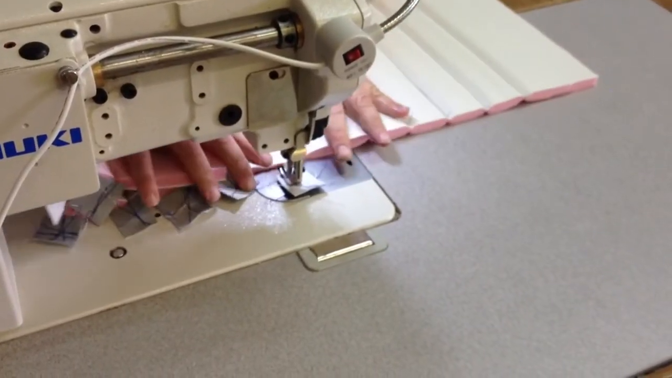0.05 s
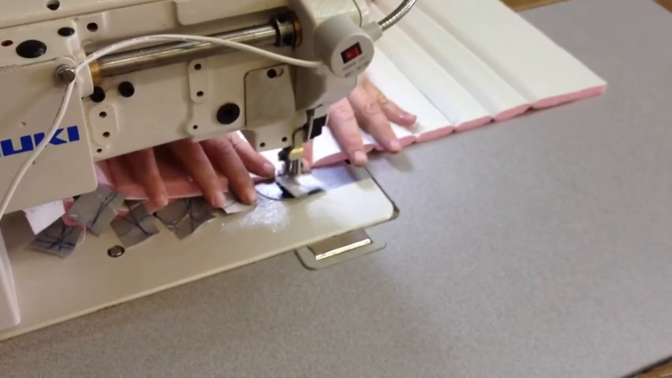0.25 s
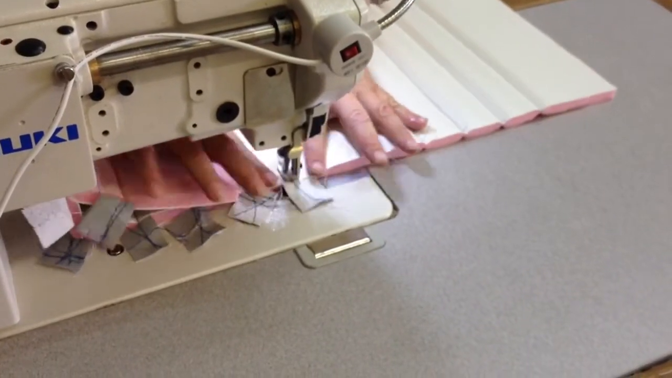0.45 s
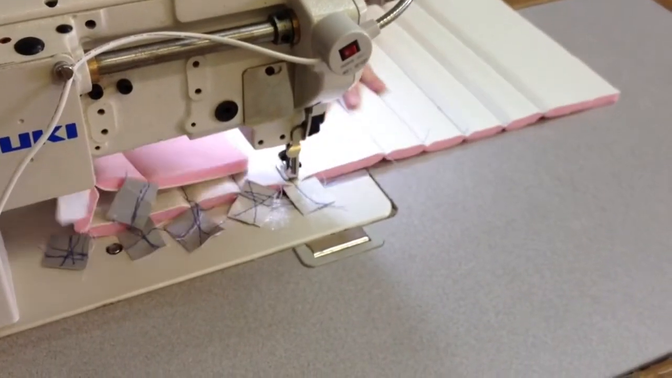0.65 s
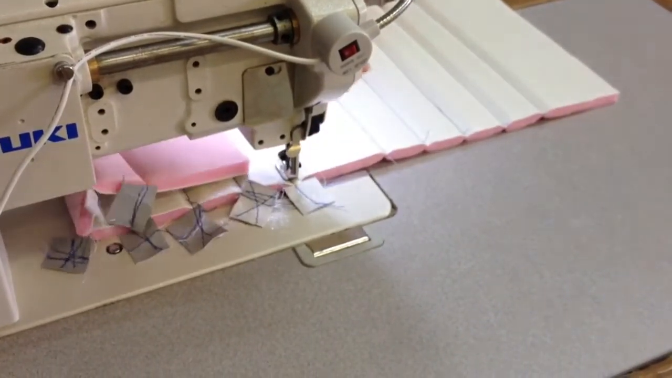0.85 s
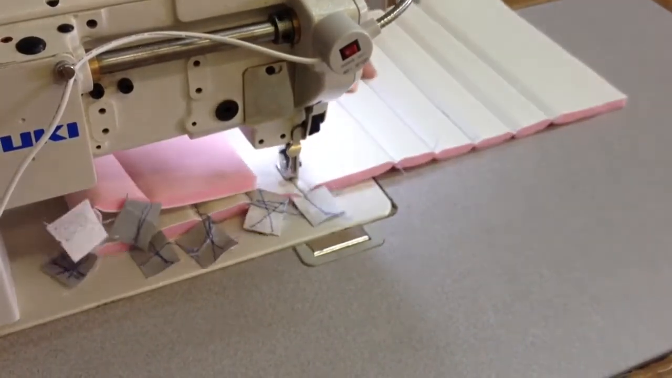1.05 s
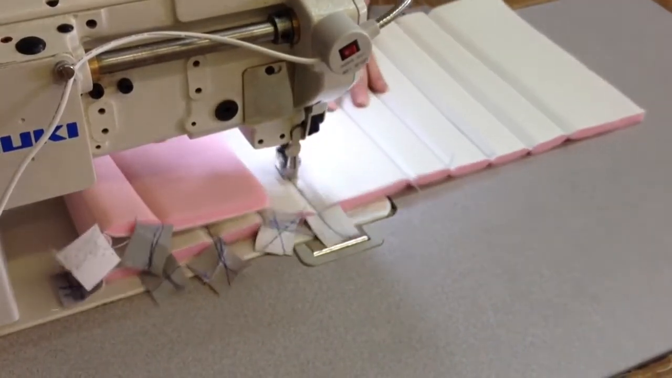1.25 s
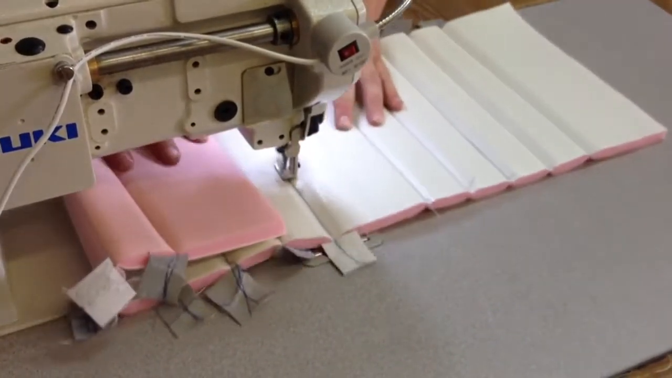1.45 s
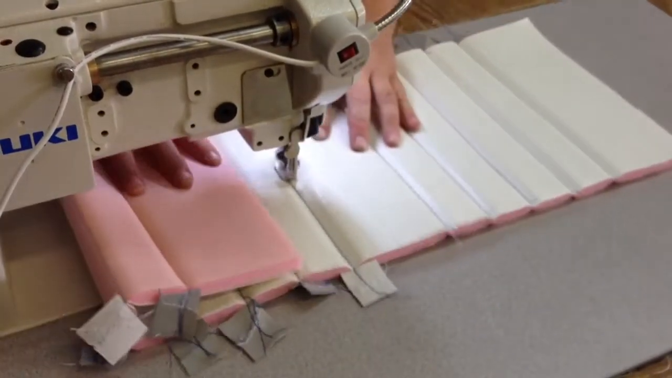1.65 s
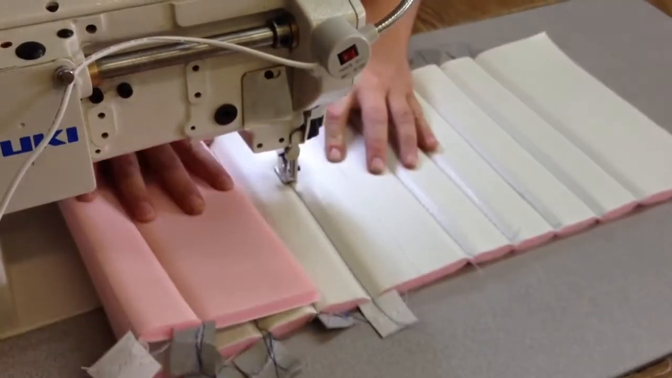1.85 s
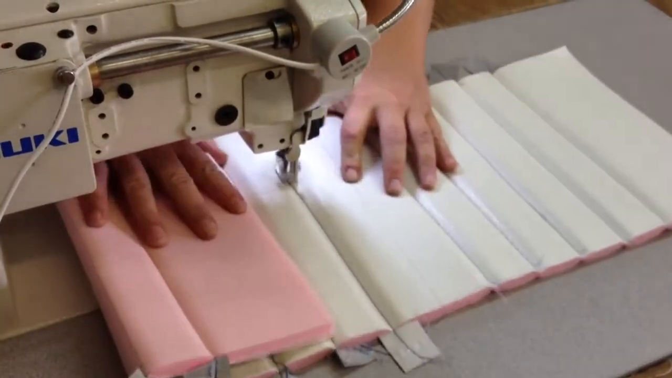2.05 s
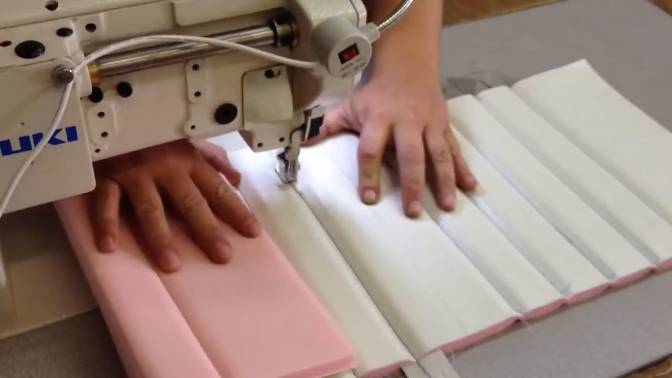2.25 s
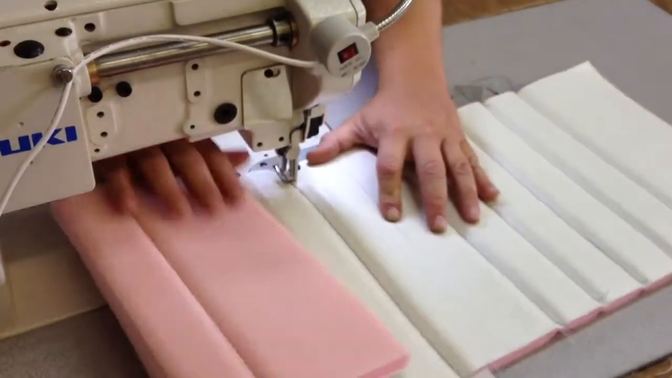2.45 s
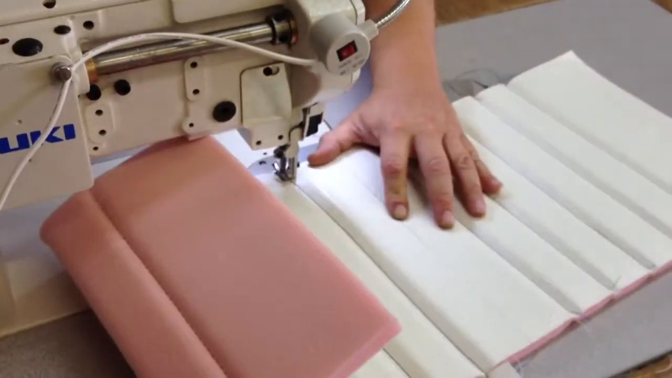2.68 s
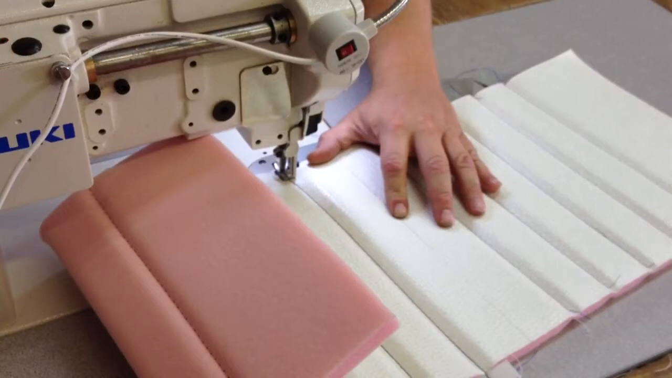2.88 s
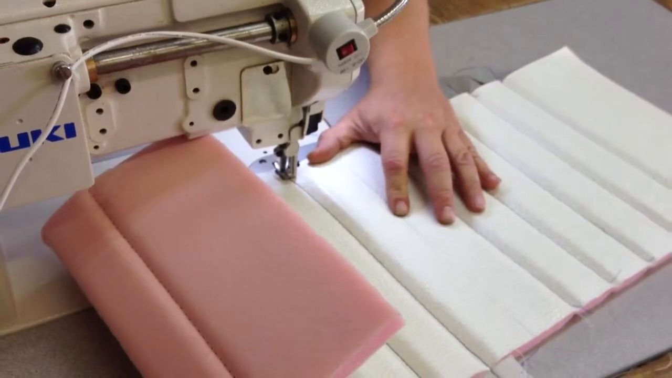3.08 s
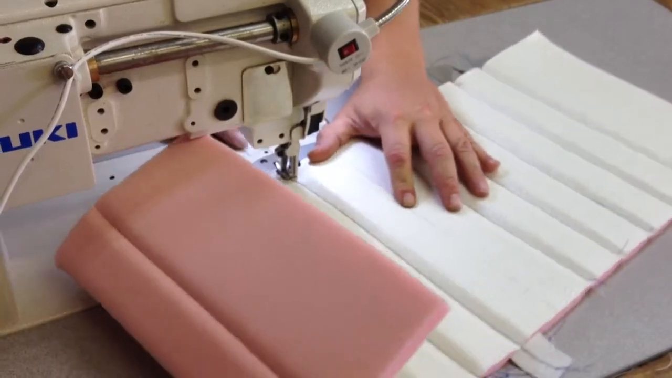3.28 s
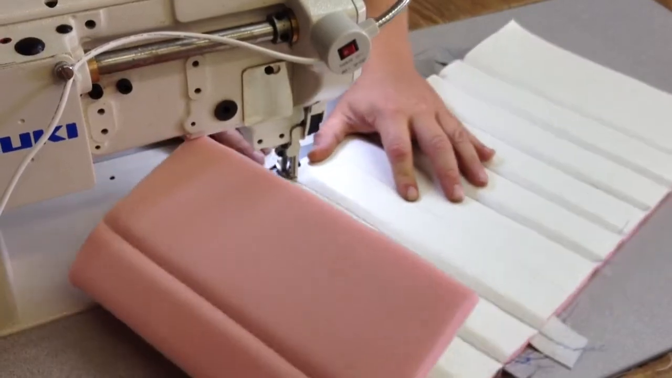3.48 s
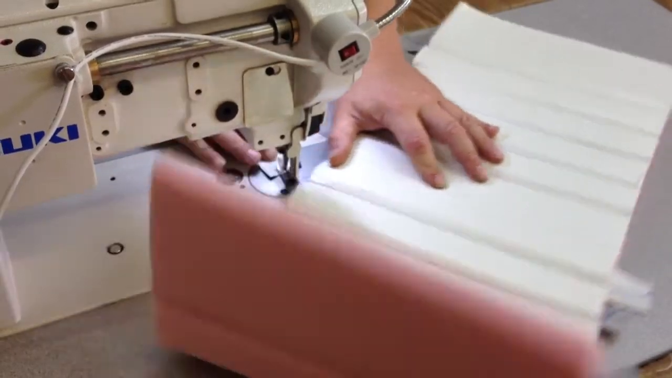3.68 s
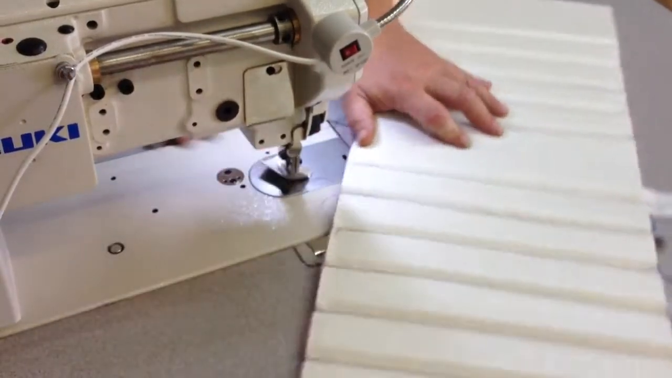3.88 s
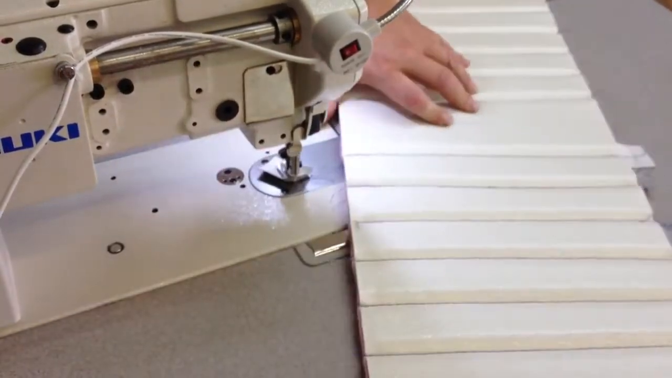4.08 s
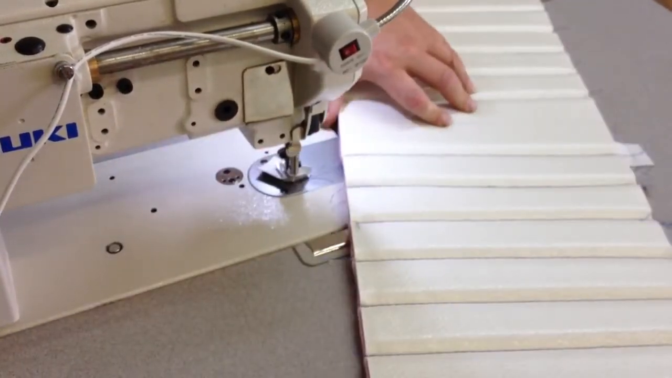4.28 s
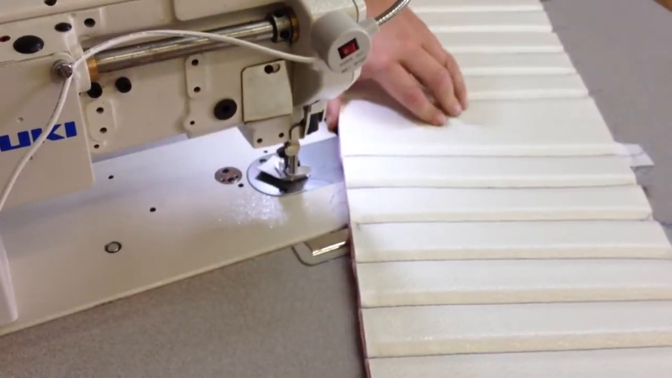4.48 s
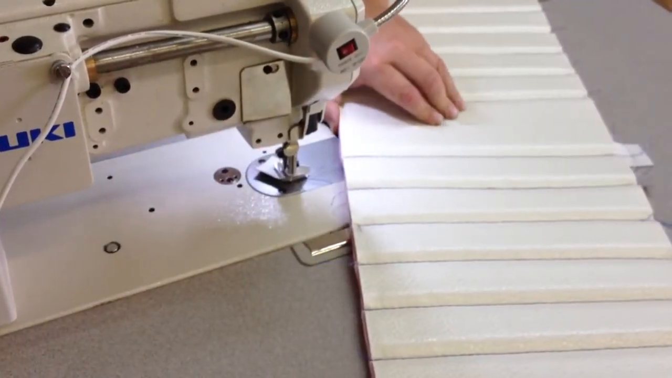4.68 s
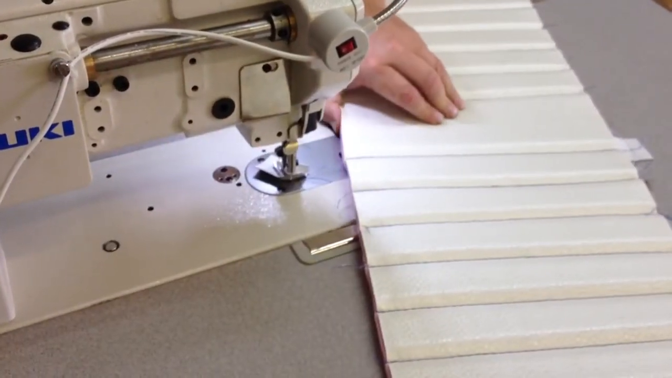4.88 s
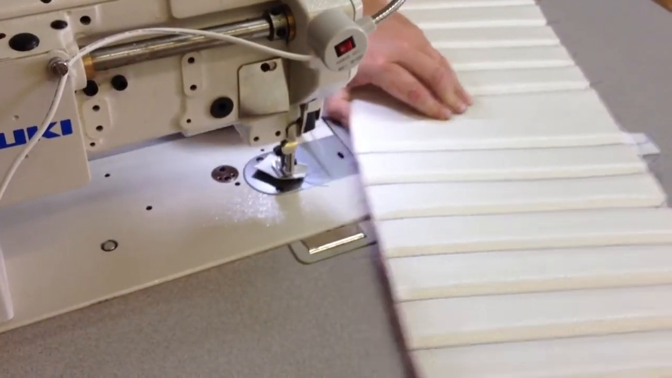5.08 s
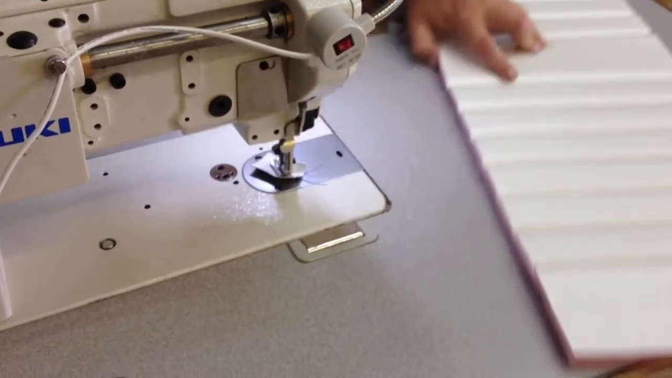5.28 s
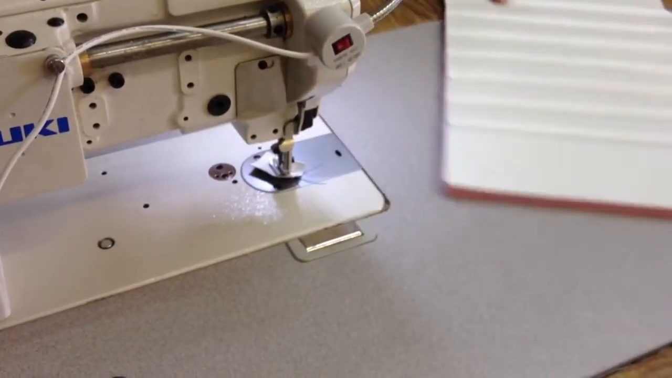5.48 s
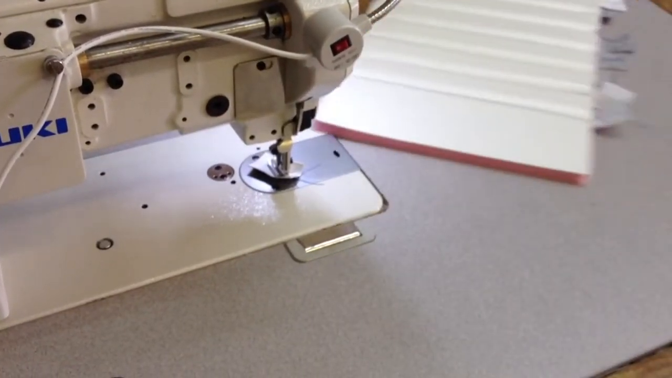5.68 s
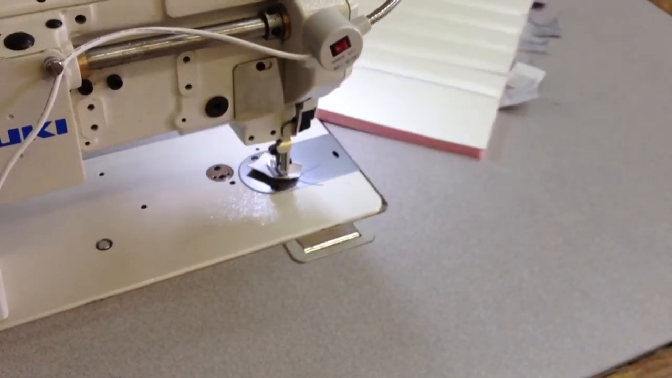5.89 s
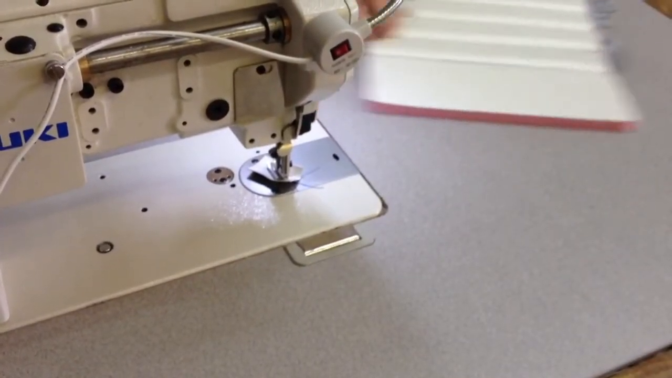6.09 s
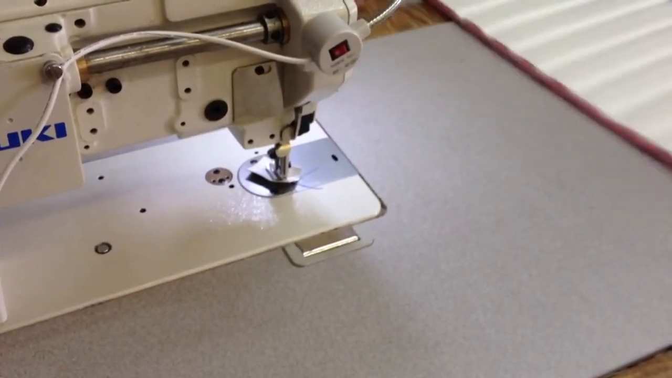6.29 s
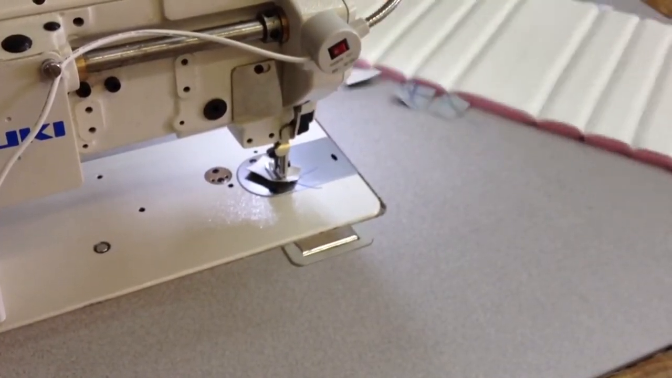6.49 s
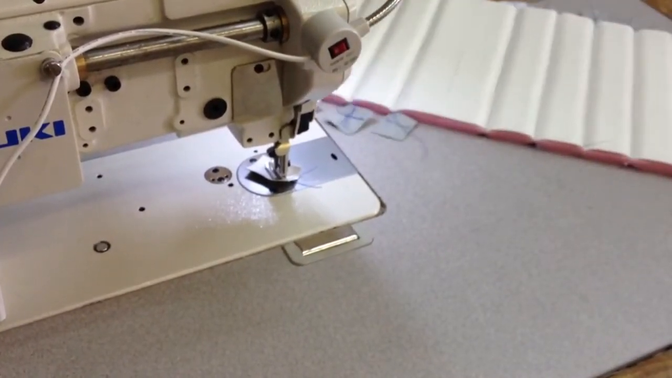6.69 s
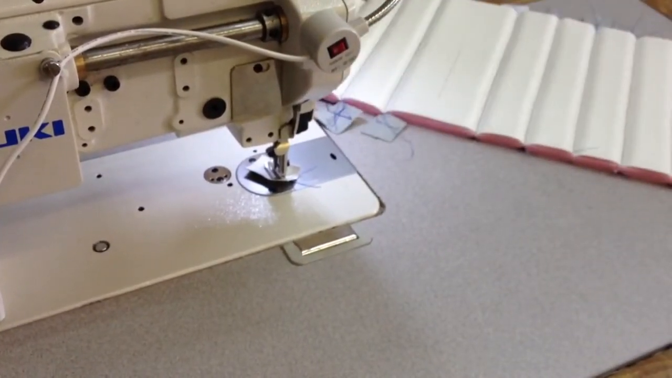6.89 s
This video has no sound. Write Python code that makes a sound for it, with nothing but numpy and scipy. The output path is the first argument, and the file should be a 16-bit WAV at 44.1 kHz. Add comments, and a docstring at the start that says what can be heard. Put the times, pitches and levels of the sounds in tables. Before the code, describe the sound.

Three bursts of rapid, thumping sewing machine stitching, short, long, short, followed by soft vinyl rubbing, small clicks and a steady hum.

```python
"""In a workshop, an industrial sewing machine stitches padded upholstery in three bursts.
Each turn of its shaft makes one stitch: it rocks the table and plays the same round of steel knocks,
clacks and ticks, harder with speed and load, over the whine of the drive. A motor hums throughout.
Around the bursts the panel slides over the table, small things click and fingertips skid on vinyl."""
import sys
import numpy as np
from scipy import signal
from scipy.fft import rfft, irfft
from scipy.io import wavfile
from scipy.ndimage import uniform_filter1d

SR = 44100
rng = np.random.default_rng(int(sys.argv[2]) if len(sys.argv) > 2 else 0)


def pcm_store(signal):
    """Save signal as 16-bit PCM."""
    levels = np.round(np.clip(np.atleast_2d(signal), -1, 1) * 32767)
    wavfile.write(sys.argv[1], SR, levels.astype(np.int16).T)


N = 306054
TIME = np.arange(N) / SR
FULL_SPEED = 27  # stitches per second


def amp(db):
    """Turn decibels into a number to multiply by."""
    return 10 ** (np.asarray(db) / 20)


def rms_one(x):
    """Scale a signal so that its average strength (rms) is 1."""
    return x / np.sqrt(np.mean(x ** 2) + 1e-20)


def along(rows, t):
    """Read a table at t, drawing straight lines between its rows."""
    times, *columns = np.transpose(rows)
    return [np.interp(t, times, column) for column in columns]


def drift(rate):
    """A random wander of strength 1 that heads for a new value `rate` times a second."""
    return rms_one(np.interp(TIME * rate, np.arange(N), rng.standard_normal(N)))


def colour(x, spectrum, peaks=(), size=4096):
    """Give a sound its tone colour: a smooth curve plus ringing peaks. Only relative levels count."""
    hz = np.abs(np.fft.fftfreq(size, 1 / SR)) + 1
    points = np.array(spectrum)
    db = np.interp(np.log(hz), np.log(points[:, 0]), points[:, 1])
    for centre, width, lift in peaks:
        db = db + lift / (1 + (2 * (hz - centre) / width) ** 2)
    gains = np.exp(signal.hilbert(np.log(amp(db))))  # rings after a hit, never before it
    response = np.fft.fft(gains).real[:size // 2]
    return signal.oaconvolve(x, response / np.linalg.norm(response))[:N]


def cut_bass(x, hz, order):
    """Weaken everything below hz; a higher order cuts more steeply."""
    return signal.sosfilt(signal.butter(order, hz, "high", fs=SR, output="sos"), x)


def decay(t, ring_s):
    """A fade that falls by 60 dB in the ring time."""
    return np.exp(-np.log(1000) * t / ring_s)


def spray(ring_s, size=8192):
    """A dying spray of tiny impacts."""
    return rng.standard_normal(size) * decay(TIME[:size], ring_s)


def add(track, s, sound):
    """Mix a sound into a track, starting at s seconds."""
    start = int(np.clip(round(s * SR), 0, N - 1))
    track[start:start + len(sound)] += sound[:N - start]


# Notes of the idling motor (pitch [Hz], level [dB])
HUM_NOTES = [(129.2, -57.5), (263.8, -51.5), (323.0, -55.5), (360.7, -59)]
# Tone colour of the workshop air (frequency [Hz], level [dB])
AIR_COLOUR = [(26, -26), (54, -44), (88, -18), (125, 3.5), (205, 2), (440, 2.5), (560, -8), (700, -5.5),
              (1020, -3), (1220, -7.5), (2450, -9), (3250, -21), (4750, -19.5), (9600, -27.5), (15400, -38)]


def hum_and_air(waver_db=3.5, air_db=-43):
    """A motor hums, wavering in level and pitch, in the steady rush of the workshop."""
    hum = np.zeros(N)
    for hz, db in HUM_NOTES:
        level = amp(db + waver_db * drift(7.9))
        hum += level * np.sin(2 * np.pi * hz * TIME + drift(8.6))
    return np.sqrt(2) * hum + amp(air_db) * colour(rng.standard_normal(N), AIR_COLOUR)


# Pushes of the panel and strokes of the hand (time [s], length [s], rub [dB], swish [dB])
PUSHES = [(0.117, 0.38, -43, -51), (0.57, 0.078, -45, -50.5), (0.874, 0.38, -38, -41.5),
          (3.007, 0.13, -52, -60), (3.196, 0.44, -53, -69), (3.56, 0.21, -45.5, -64),
          (4.72, 0.55, -73, -63), (5.087, 0.6, -51.5, -75), (5.96, 0.52, -50, -77),
          (6.19, 0.26, -48.5, -73)]
# Tone colours of the rubbing panel and of a hand on the fabric (frequency [Hz], level [dB])
RUB_COLOUR = [(210, -47), (1180, 12), (2280, 9), (3550, -1), (4280, -3), (4770, 7.5), (5250, -2.5),
              (6150, 0), (8400, -5), (10200, -11), (12400, -5.5), (15400, -12)]
SWISH_COLOUR = [(1000, -33), (4800, -22), (6100, 2), (8500, -5), (10500, -7.5), (13000, -9), (15400, -25)]


def cloth(rise_s=.064, fall_s=.17, resting_db=-67):
    """Each push swells, holds and dies away; the weave rubs in fine grains, catching and letting go."""
    rub_power, swish_power = amp(resting_db) ** 2, 0
    for s, length, rub_db, swish_db in PUSHES:
        swell = np.clip((TIME - s) / rise_s, 0, 1)
        push = swell * np.exp(-np.maximum(TIME - s - length, 0) / fall_s)
        rub_power += (amp(rub_db) * push) ** 2
        swish_power += (amp(swish_db) * push) ** 2
    noise = rng.standard_normal((2, N))
    grain_db, catch_db = drift(980), drift(27)
    rub, swish = rms_one(noise * amp(grain_db + catch_db))
    rubbing = np.sqrt(rub_power) * colour(rub, RUB_COLOUR)
    return rubbing + np.sqrt(swish_power) * colour(swish, SWISH_COLOUR)


# Low notes of the table and the machine's bed (pitch [Hz], signed strength [ratio], ring time [s])
TABLE_NOTES = [(132.5, .22, .113), (183, .51, .109), (216.4, -.5, .18), (245.4, -.92, .13), (275, .27, .16),
               (315.6, -.34, .108), (384, -.25, .1), (448.7, -.2, .1)]


def table_boom(force):
    """The table and the bed ring when struck, some notes moving with the blow and some against it."""
    t = TIME[:SR // 3]
    ring = sum(strength * np.sin(2 * np.pi * hz * t) * decay(t, ring_s)
               for hz, strength, ring_s in TABLE_NOTES)
    ring = cut_bass(cut_bass(ring, 95, order=2), 60, order=1)  # the ring carries little deep bass
    return signal.oaconvolve(force, ring)[:N]


# Clicks of tools, work and the machine itself (time [s], body [dB], bright edge [dB], ring time [s])
HARD_CLICKS = [(.166, -36.5, -36, 0.059), (0.249, -35, -43, 0.018), (0.281, -24.5, -37, 0.019),
               (.332, -45, -25, 0.025), (.843, -34.5, -39.5, 0.066), (0.968, -16, -25, 0.01),
               (1.028, -15, -19, 0.012), (1.907, -24, -24, 0.029), (3.692, -27, -26.5, 0.037),
               (4.181, -29.5, -39, 0.026), (5.007, -39.5, -52, 0.072), (5.073, -56, -34.5, 0.03),
               (5.078, -58, -29.5, 0.012), (5.5822, -25, -19.5, .01), (5.5937, -19, -15.5, .01),
               (5.6, -22, -31, .033), (5.692, -33, -38, 0.02), (5.761, -42, -39, .016),
               (5.949, -38, -47, 0.13), (6.293, -38.5, -62, 0.2), (6.637, -52, -39, .02)]
# Tone colours of a click's body and bright edge (frequency [Hz], level [dB])
BODY_COLOUR = [(40, -38), (205, -3.5), (810, -18), (1050, 4), (1300, -7), (1530, 2), (2100, 0.5),
               (3000, -6.5), (5000, -35), (14500, -36)]
EDGE_COLOUR = [(60, -55), (2500, -9), (3600, 0), (5500, 2), (7800, -5), (10500, -16), (12500, -14),
               (15500, -26)]
# Bumps of pedal, hands and panel against the table (time [s], force [dB])
SOFT_BUMPS = [(0.163, -35), (0.825, -33.5), (3.658, -28), (4.184, -44), (4.98, -38)]


def handling(click_gain_db=-3):
    """Small hard things click sharply, and soft bumps make the table ring."""
    body, edge, force = np.zeros((3, N))
    for s, body_db, edge_db, ring_s in HARD_CLICKS:
        add(body, s, amp(body_db) * spray(ring_s))
        add(edge, s, amp(edge_db) * spray(ring_s))
    for s, db in SOFT_BUMPS:
        add(force, s, amp([db]))
    clicks = colour(body, BODY_COLOUR) + colour(edge, EDGE_COLOUR)
    return amp(click_gain_db) * clicks + table_boom(force)


# Speed of the main shaft, one curve per burst (time [s], speed [stitches/s])
SHAFT_SPEED = [
    [(.282, 10.74), (.345, 19.98), (.432, 25.7), (.461, 14.23), (.56, 13.45)],
    [(.904, 18.17), (.98, 14.31), (1.071, 24.24), (1.17, 27.87), (1.27, 28.81), (1.4, 28.82), (1.53, 27.34),
     (1.67, 26.81), (2.05, 27.04), (2.478, 27.19), (2.528, 13.82), (2.62, 8.02)],
    [(3.708, 12), (3.755, 19), (3.805, 23.3), (3.857, 23.9), (3.866, 15), (3.99, 8.5)],
]
# Where the shaft stands before each burst (angle [turns])
START_ANGLES = [0, 0, .47]


def shaft():
    """The shaft speeds up and brakes: gives the times, speeds and angles of each burst."""
    for curve, start_angle in zip(SHAFT_SPEED, START_ANGLES):
        t = TIME[(TIME >= curve[0][0]) & (TIME <= curve[-1][0])]
        speed, = along(curve, t)
        yield t, speed, start_angle + np.cumsum(speed) / SR


# Load on the needle as thicker and thinner layers pass under it (time [s], load [dB])
NEEDLE_LOAD = [(.42, 5), (.93, -59), (.97, -2.5), (1.3, 2.5), (1.75, 0.5), (2.46, 5), (3.8, 14)]
# How hard the parts hit; rows for thump, clack and tick
# (level at full speed [dB], rise per doubling of speed [dB], share of the load [ratio])
BLOW_STRENGTH = [(-23.5, 0.89, 0.19), (-25, 10.2, 0.21), (-27.5, 9.2, 0.34)]


def blows(turn, momentum_s=.018, braking_db=-8.5):
    """A blow each time the shaft passes an angle: (time [s], thump [dB], clack [dB], tick [dB])."""
    rows = []
    for t, speed, turns in shaft():
        angles = np.arange(turn, turns[-1], 1)
        times = np.interp(angles[angles >= turns[0]], turns, t)
        # Moving parts carry their speed on for a moment.
        carried = np.maximum(np.interp(times, t, speed), np.interp(times - momentum_s, t, speed))
        top_speed = np.interp(times, t, np.maximum.accumulate(speed))
        braking = top_speed - carried > 5  # blows soften once 5 stitches/s are lost
        load_db, = along(NEEDLE_LOAD, times)
        levels = [db + per_doubling * np.log2(carried / FULL_SPEED) + share * load_db
                  for db, per_doubling, share in BLOW_STRENGTH]
        rows.append(np.column_stack([times, *(levels + braking_db * braking)]))
    return np.vstack(rows)


# Shoves of needle bar, feed and feet within one stitch (angle [turns], signed force [ratio])
SHOVES = [(.126, .89), (.5, -.08), (.704, .51), (.861, -.39)]
# Jolts as the drive takes hold, pulls up to speed and brakes (time [s], force [dB])
DRIVE_JOLTS = [(.283, -22), (.319, -20), (.896, -30), (1.024, -33), (2.5, -30), (3.708, -20), (3.752, -21),
               (3.887, -23)]


def thumps(gain_db=4.8, uneven_db=1):
    """The moving parts shove the table at the same angles of every turn, and the drive jolts it."""
    force = np.zeros(N)
    for turn, push in SHOVES:
        for s, thump_db, _, _ in blows(turn):
            add(force, s, push * amp([thump_db + gain_db + uneven_db * rng.standard_normal()]))
    for s, db in DRIVE_JOLTS:
        add(force, s, amp([db]))
    return table_boom(force)


def motor_rev(cycles_per_turn=17.7, gain_db=-30, load_share=.16, housing_hz=385, width_hz=80):
    """The motor sings a rising note as it speeds up, loudest where its housing rings along."""
    out = np.zeros(N)
    for t, speed, turns in shaft():
        pull = np.clip(np.gradient(speed, t) / 70, 0, 1)  # full pull gains 70 stitches/s each second
        pull = uniform_filter1d(pull, size=900)
        load_db, = along(NEEDLE_LOAD, t)
        note = np.sqrt(2) * np.sin(2 * np.pi * cycles_per_turn * turns)
        add(out, t[0], amp(gain_db + load_share * load_db) * pull * note)
    return signal.lfilter(*signal.iirpeak(housing_hz, housing_hz / width_hz, fs=SR), out)


def chatter(fade_s, size=1024):
    """Steel meets steel in a short spray of impacts, about equally strong at all frequencies."""
    phases = np.angle(rfft(spray(fade_s, size)))
    even_spray = rms_one(irfft(np.exp(1j * phases)))
    return even_spray * np.exp(-TIME[:size] / fade_s)


# Contacts of needle, hook, feet and feed within one stitch
# (angle [turns], knock [dB], clack [dB], tick [dB], change per stitch/s above full speed [dB])
STITCH_CONTACTS = [(.001, -5, -1.5, -1.5, 1.9), (.045, -1, -1, -9, 0), (.11, .5, -5, -15, -1),
                   (.2, -1.5, -11, -18, 0), (.26, -3, -12, -18, 0), (.33, -4, -13, -20, -1),
                   (.466, 0, 1.5, -.5, .7), (.522, 2.5, 1, -7, -.8), (.585, 0, -6, -10, 0),
                   (.67, .5, -3, -14, -.5), (.8, -10, -10, -16, 0), (.93, -4, -12, -15, 0)]


def contacts(kind, fade_s, loose_share, uneven_db, jitter_s, gain_db):
    """Each contact repeats its own chatter every stitch; looseness in the parts varies a share of it."""
    out = np.zeros(N)
    for turn, knock_db, clack_db, tick_db, overspeed_db in STITCH_CONTACTS:
        contact_db = {"knock": knock_db, "clack": clack_db, "tick": tick_db}[kind]
        own = chatter(fade_s)
        for s, _, clack_blow_db, tick_blow_db in blows(turn):
            speed, = along(np.vstack(SHAFT_SPEED), s)
            hit = np.sqrt(1 - loose_share) * own + np.sqrt(loose_share) * chatter(fade_s)
            blow_db = tick_blow_db if kind == "tick" else clack_blow_db
            db = blow_db + contact_db + gain_db + overspeed_db * max(speed - FULL_SPEED, 0)
            start = s + jitter_s * rng.standard_normal()
            add(out, start, amp(db + uneven_db * rng.standard_normal()) * rms_one(hit))
    return out


# Tone colours of the rods under the bed, the cast head and the thin steel parts
# (frequency [Hz], level [dB])
ROD_COLOUR = [(110, -26), (310, -5), (480, -4), (600, -1.5), (780, -0.5), (1000, -4), (1450, -1.5),
              (1800, -11), (4000, -27.5)]
HEAD_COLOUR = [(300, -40), (1200, -9.5), (1600, -.5), (2480, 2), (2950, -4.5), (3350, -7.5), (4500, -17),
               (15000, -25.5)]
STEEL_COLOUR = [(310, -18), (2050, -10), (3870, -18), (4280, 3), (5450, 2), (7350, -1.5), (8250, -4.5),
                (10600, -12.5), (12900, -7), (15400, -31)]
# Where the same three ring (frequency [Hz], width [Hz], boost [dB])
ROD_RINGS = [(1030, 47, 4.4), (1365, 120, 4.2)]
HEAD_RINGS = [(1732, 110, 5.5), (2124, 74, 6.6), (2320, 110, 4.5), (2470, 52, 2), (2864, 190, 5.8)]
STEEL_RINGS = [(4400, 300, 2.5), (5750, 450, 3), (7300, 500, 2)]


def machine_clatter():
    """The linking rods knock dully, the cast head clacks, and the needle and feet tick brightly."""
    knocks = contacts("knock", fade_s=.014, loose_share=.42, uneven_db=.9, jitter_s=2e-5, gain_db=-14.5)
    clacks = contacts("clack", fade_s=.014, loose_share=.2, uneven_db=.7, jitter_s=2e-5, gain_db=-7)
    ticks = contacts("tick", fade_s=.0105, loose_share=.35, uneven_db=.6, jitter_s=5e-5, gain_db=-4)
    return (colour(knocks, ROD_COLOUR, ROD_RINGS)
            + colour(clacks, HEAD_COLOUR, HEAD_RINGS)
            + colour(ticks, STEEL_COLOUR, STEEL_RINGS))


# Tone colour of needle and feet striking the work (frequency [Hz], level [dB])
CRACK_COLOUR = [(300, -15), (1000, 8.5), (1900, 1.5), (2400, 6.5), (3200, 6), (3900, -14), (4350, 0),
                (5000, 4), (5650, 4), (6500, 1), (7300, 9), (8200, -38), (10000, -24), (12500, -4),
                (15400, -16)]


def needle_cracks(at_turns=(.001, .466), ring_s=.009, gain_db=-8.3, load_share=.38):
    """Needle and feet meet the work twice a stitch with a dry crack, louder where it is thick."""
    out = np.zeros(N)
    for turn in at_turns:
        for s, _, _, tick_db in blows(turn):
            load_db, = along(NEEDLE_LOAD, s)
            crack = rms_one(spray(ring_s, size=1024))
            add(out, s, amp(tick_db + gain_db + load_share * load_db) * crack)
    return colour(out, CRACK_COLOUR)


def presser_foot(turn=.241, thud_hz=387, swell_s=.0016, gain_db=1):
    """The foot that holds the work lands in the foam once a stitch with a short, dead thud."""
    t, out = TIME[:1024], np.zeros(N)
    swell = t / swell_s * np.exp(1 - t / swell_s)
    thud = -np.sin(2 * np.pi * thud_hz * t) * swell
    for s, thump_db, _, _ in blows(turn):
        add(out, s, amp(thump_db + gain_db) * thud)
    return cut_bass(out, 110, order=2)


# Notes of the drive (pitch [cycles per shaft turn], level at full speed [dB])
WHINE_NOTES = [(7, -27.7), (10, -43)]


def drive_whine(per_doubling_db=18, waver_db=3.5, fade_s=.17, heaviest_pull_turn=.127):
    """Motor and belt sing at multiples of the shaft speed, heard only near full speed."""
    out = np.zeros(N)
    for t, speed, turns in shaft():
        notes = sum(amp(db) * np.sin(2 * np.pi * cycles * (turns + heaviest_pull_turn))
                    for cycles, db in WHINE_NOTES)
        fade = np.clip(np.minimum(t - t[0], t[-1] - t) / fade_s, 0, 1)
        speed_db = per_doubling_db * np.log2(speed / FULL_SPEED)
        add(out, t[0], np.sqrt(2) * notes * fade * amp(speed_db))
    return out * amp(waver_db * drift(5.3))


# Skids of a fingertip (time [s], rise time [s], level [dB], note [Hz])
SKIDS = [(3.04, 0.061, -51.5, 6200), (3.488, 0.022, -46.5, 8240)]
# Tone colour of their hiss (frequency [Hz], level [dB])
SKID_COLOUR = [(2500, -30), (5000, -1), (8000, -2), (13000, -5), (15400, -12)]


def finger_skids(grain_db=1.5, note_width_hz=1100, note_boost_db=8):
    """A fingertip skids on the vinyl: a grainy hiss swells and fades, with one note standing out."""
    out = np.zeros(N)
    for s, rise_s, db, hz in SKIDS:
        age = np.maximum(TIME - s, 0) / rise_s
        swell = (age * np.exp(1 - age)) ** 2
        grains = rms_one(rng.standard_normal(N) * amp(grain_db * drift(700)))
        out += amp(db) * swell * colour(grains, SKID_COLOUR, [(hz, note_width_hz, note_boost_db)])
    return out


# Echo of the workshop (frequency [Hz], ring time [s], level [dB])
ROOM_ECHO = [(155, 0.41, 11.5), (445, 1, 0), (1100, 0.35, 0.5), (2740, 0.42, -4), (5860, 0.41, -4),
             (12800, 0.32, 0.5)]


def workshop_echo(x, delay_s=.0048, size=32768):
    """Many reflections blur into one fading tail, which lasts longest in the low middle notes."""
    t, response = TIME[:size], np.zeros(size)
    hz, noise = np.fft.rfftfreq(size, 1 / SR), rfft(rng.standard_normal(size))
    edges_hz = np.geomspace(90, 18000, 16)
    room = [(np.log(f), ring_s, db) for f, ring_s, db in ROOM_ECHO]
    for low, high in zip(edges_hz, edges_hz[1:]):
        ring_s, db = along(room, np.log(low * high) / 2)
        band = irfft(noise * (hz >= low) * (hz < high))
        tail = band * decay(t, ring_s) * (t > delay_s)
        band_share = 2 * (high - low) / SR
        response += amp(db) * tail / np.linalg.norm(tail) * np.sqrt(band_share)
    return signal.oaconvolve(x, response)[:N]


def scene(handling_echo_db=-3, boom_echo_db=-16):
    """Mix all the sounds; only the clatter, the handling and a little of the boom get an echo."""
    boom = thumps() + presser_foot() + motor_rev()
    clatter = machine_clatter()
    clicks = handling()
    echo = workshop_echo(clatter + amp(handling_echo_db) * clicks + amp(boom_echo_db) * boom)
    machine = boom + clatter + drive_whine() + needle_cracks()
    return (machine + clicks + echo + cloth() + finger_skids() + hum_and_air())[None]


def record(dry, bass_hz=45, top_hz=15300):
    """The microphone thins the deep bass and cuts the highest treble."""
    treble_cut = signal.ellip(10, .2, 80, top_hz, fs=SR, output="sos")
    return signal.sosfilt(treble_cut, cut_bass(dry, bass_hz, order=1))


dry = scene()
out = record(dry)
pcm_store(out)
```